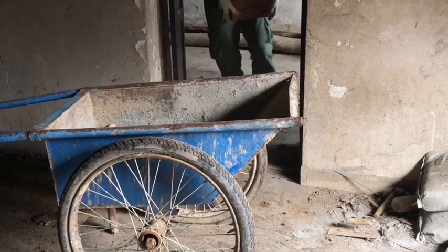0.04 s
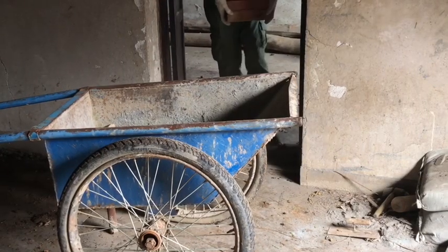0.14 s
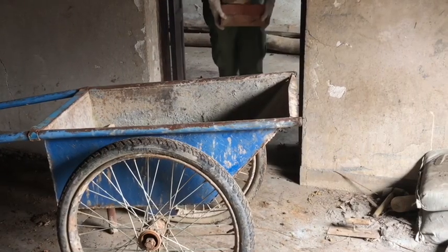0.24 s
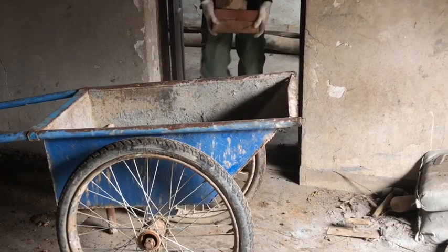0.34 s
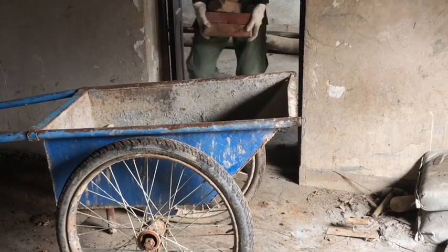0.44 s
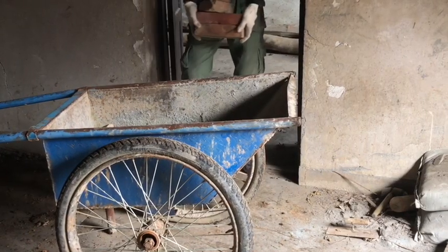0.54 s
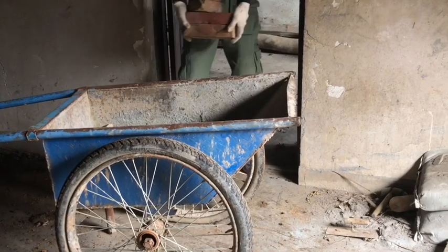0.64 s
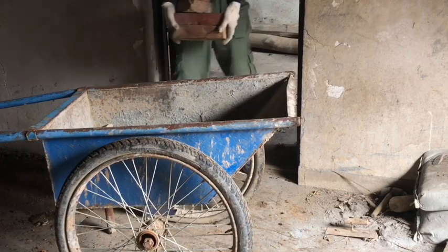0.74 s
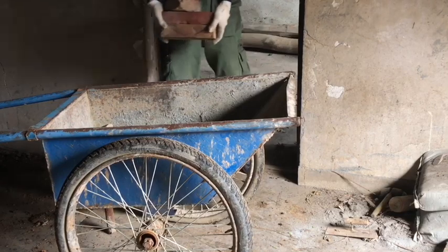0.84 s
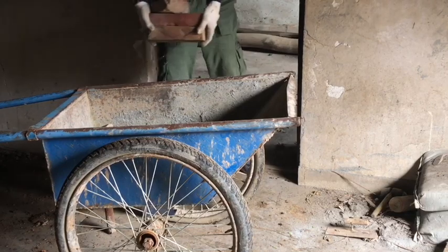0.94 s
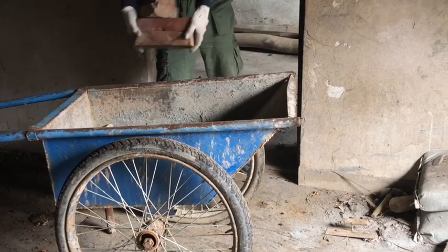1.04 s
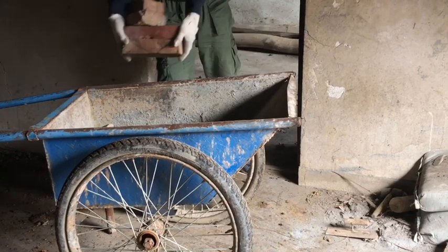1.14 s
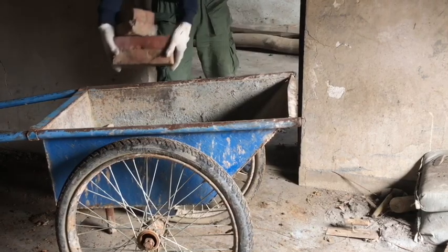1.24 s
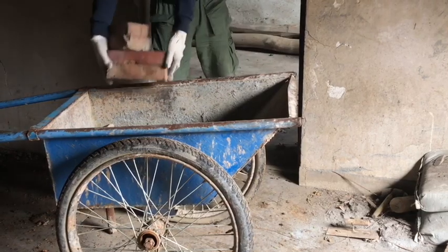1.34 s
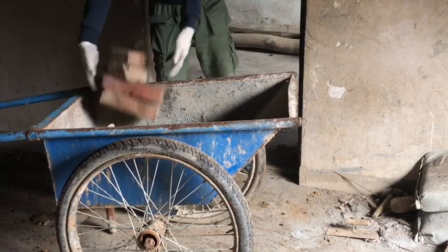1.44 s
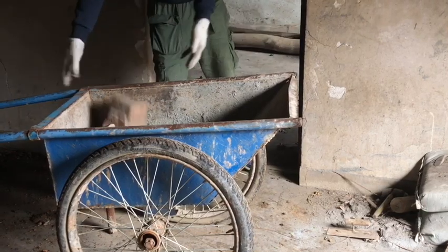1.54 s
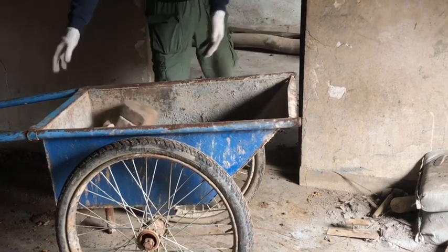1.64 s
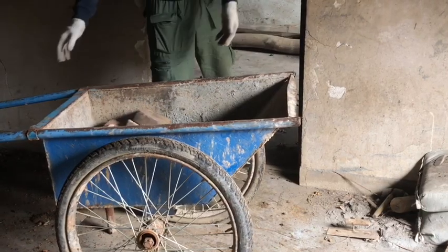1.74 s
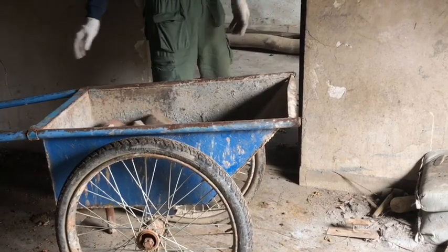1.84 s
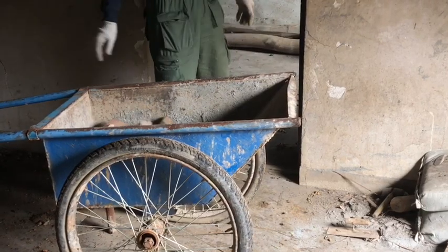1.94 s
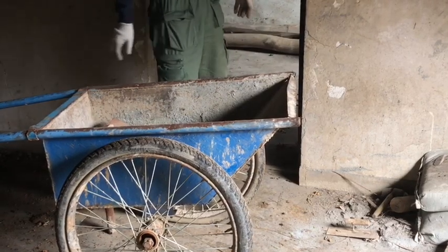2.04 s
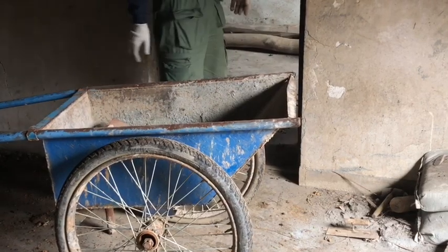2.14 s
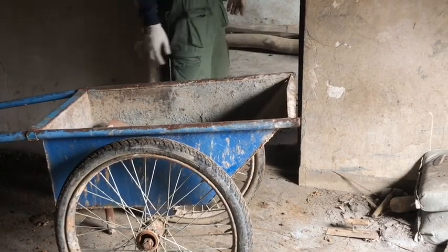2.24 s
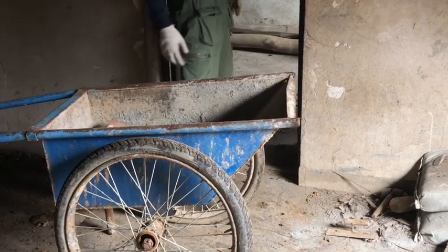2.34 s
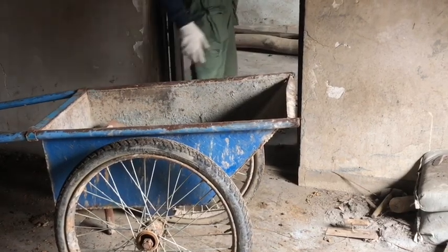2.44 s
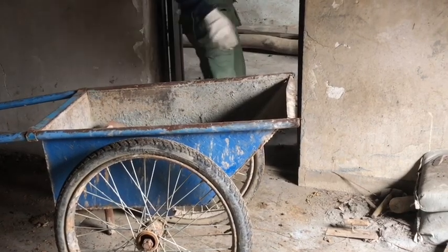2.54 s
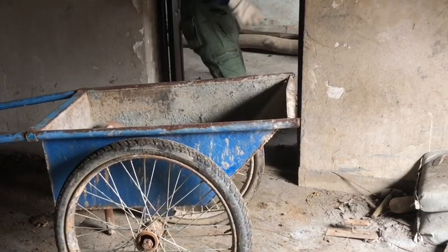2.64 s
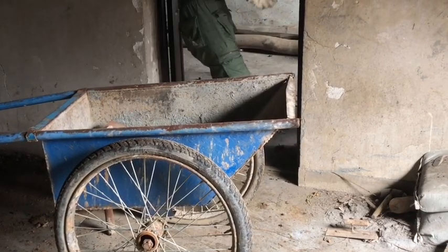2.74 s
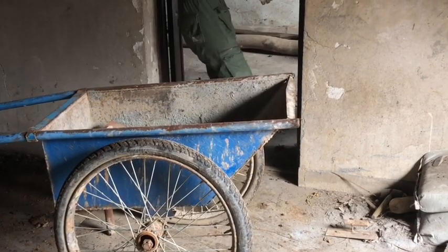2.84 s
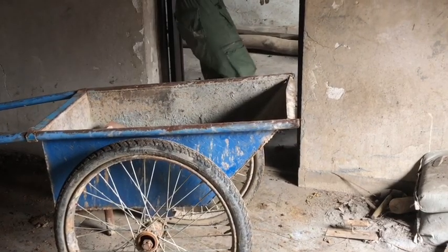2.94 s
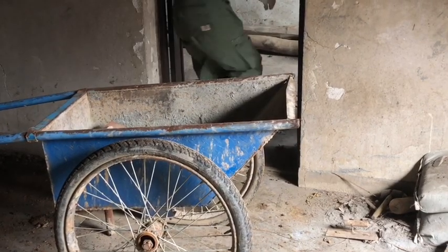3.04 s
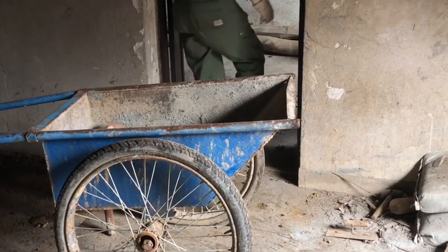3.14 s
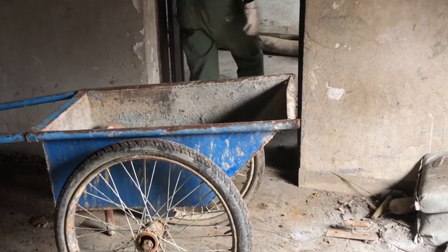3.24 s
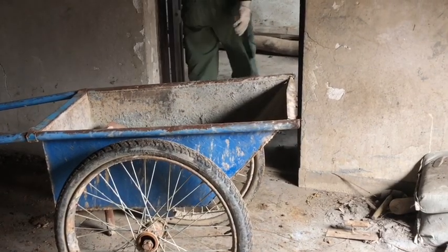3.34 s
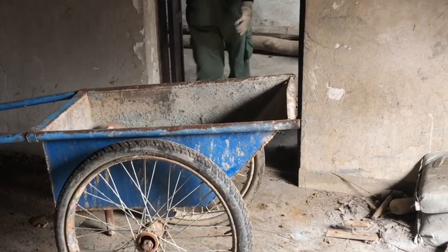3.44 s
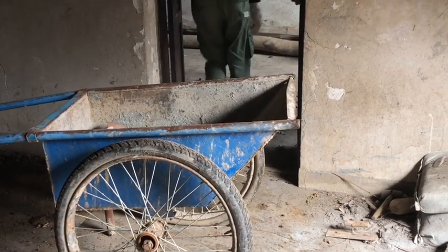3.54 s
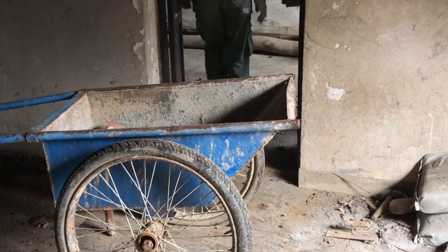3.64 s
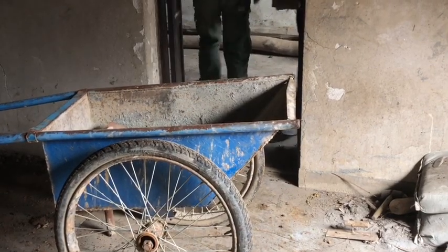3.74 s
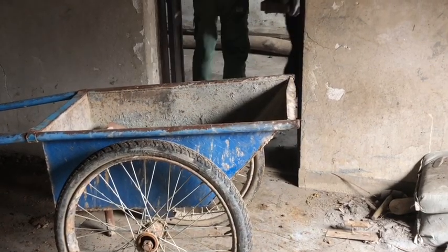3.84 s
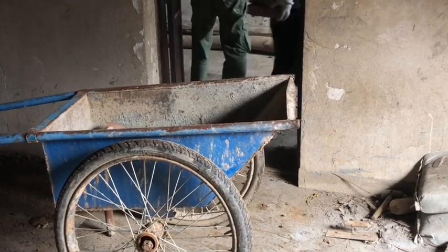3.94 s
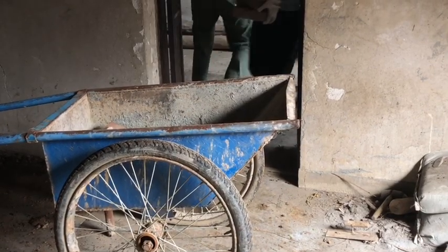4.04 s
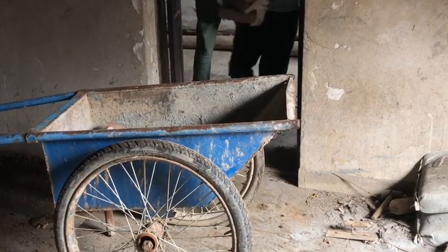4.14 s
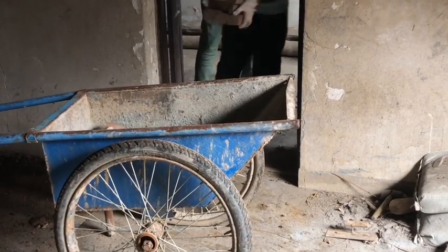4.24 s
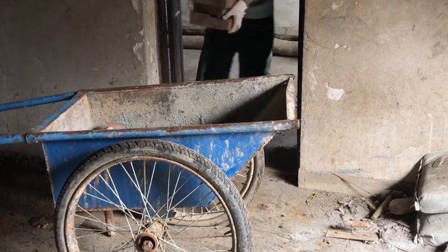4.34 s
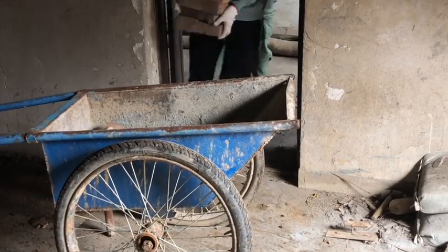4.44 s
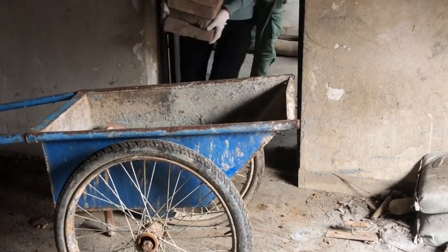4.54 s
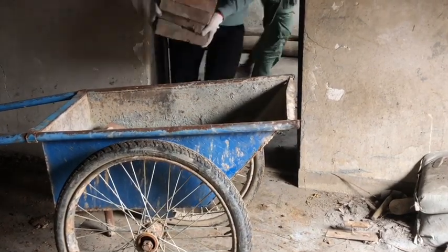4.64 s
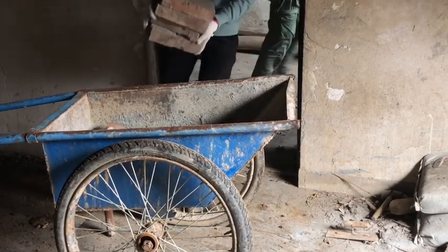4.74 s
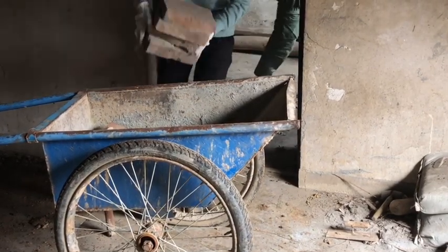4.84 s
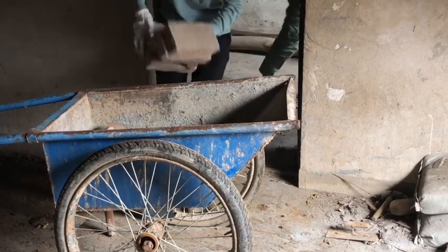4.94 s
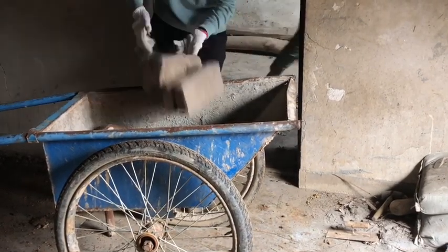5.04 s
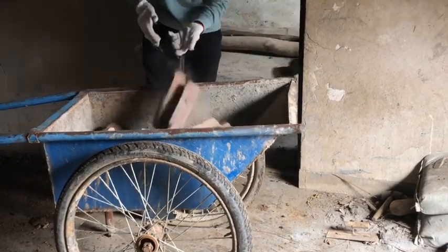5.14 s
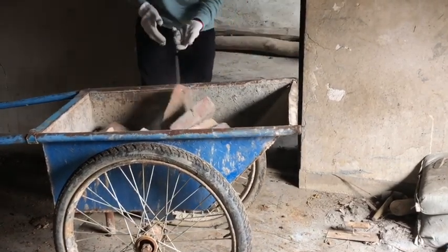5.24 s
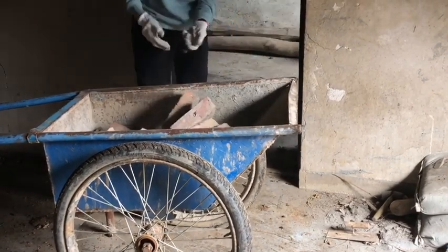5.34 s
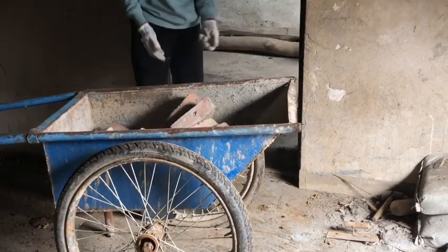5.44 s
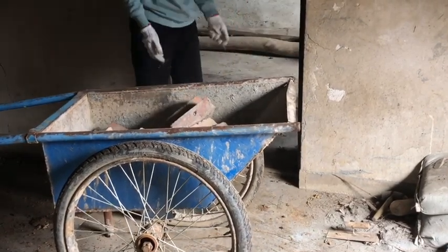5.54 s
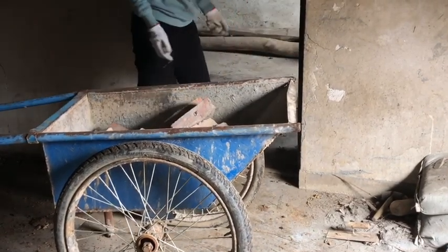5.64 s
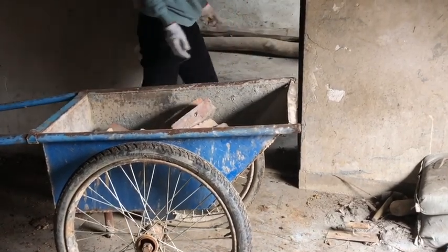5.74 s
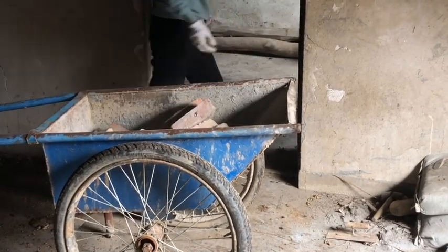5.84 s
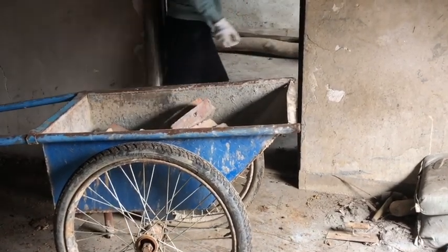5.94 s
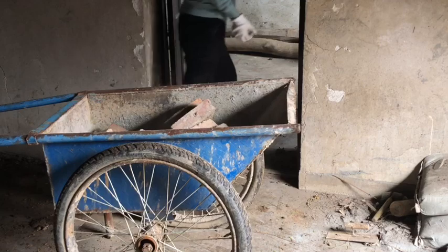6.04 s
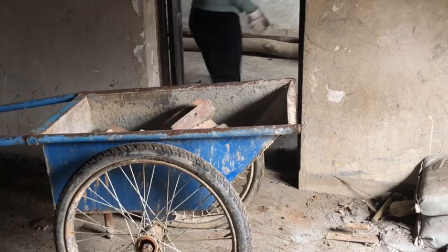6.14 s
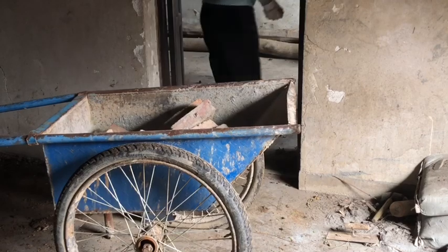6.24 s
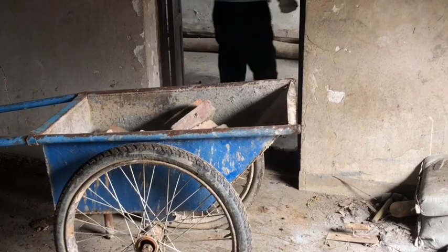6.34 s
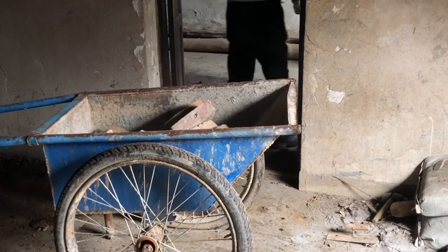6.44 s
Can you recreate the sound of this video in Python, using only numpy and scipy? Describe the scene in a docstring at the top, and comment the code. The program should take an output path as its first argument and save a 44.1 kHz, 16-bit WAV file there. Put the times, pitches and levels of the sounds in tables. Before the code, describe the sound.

A bare, hard-walled room with very faint low air noise, heard close to a steel hand cart, in mono. From 0 to 0.5 s boots tread on gritty concrete, the last step firmer, with a loose piece of metal ringing lightly around 0.4 s. At 1.5 s an armful of bricks slams into the cart: several blows within a tenth of a second, a deep hollow tray boom, dry clay clacks, grit and short sliding squeaks, flattened by limiting. Smaller settling knocks follow, clearest at 2.05 s, fading by 2.4 s. Then near quiet, with faint scuffs at 2.5 and 3.1 s, soft steps at 3.3, 3.7, 4.3 and 4.6 s and tiny crumb snaps. At 5.0 s the second load tumbles in, blows spread to 5.35 s with brighter grit and squeals, a last knock at 5.5 s, small settling ticks, then scuffs at 5.85 s and a faint step at 6.4 s.

```python
"""Two armfuls of old bricks are dropped into a steel hand cart in a bare, unfinished room.
Each brick excites a decaying floor note, damped modes of panels and clay, and a spray of grit; the pile settles.
Before, between and after the throws, shaped noise gives boots that tread and scuff on dusty concrete.
Crumbs snap, sliding bricks sing and loose metal clinks; walls add diffuse reflections and the air a faint noise.
The recorder's limiter holds the crashes down."""
import sys
import numpy as np
from scipy import signal
from scipy.fft import rfft, irfft
from scipy.io import wavfile
from scipy.ndimage import uniform_filter1d, minimum_filter1d

SR = 44100
rng = np.random.default_rng(int(sys.argv[2]) if len(sys.argv) > 2 else 0)


def persist_wave(psi):
    """Save psi, clipped to +-1, as 16-bit WAV."""
    counts = np.round(np.clip(psi, -1, 1) * 32767).astype(np.int16)
    wavfile.write(sys.argv[1], SR, np.atleast_2d(counts).T)


N = 285975
AGE = np.arange(2 ** 15) / SR  # time since the onset of one sound [s]


def from_db(db):
    """Level: converts decibels to an amplitude ratio."""
    return 10 ** (np.asarray(db) / 20)


def rms_one(x):
    """Normalization: scales a signal to unit root mean square."""
    return x / np.sqrt(np.mean(x ** 2) + 1e-20)


def at_hz(points, hz):
    """Logarithmic frequency scale: interpolates a table along it."""
    f, value = np.transpose(points)
    return np.interp(np.log(np.maximum(hz, 1)), np.log(f), value)


def noise(spectrum, uneven_db, size=len(AGE)):
    """Random-phase synthesis: noise of a given colour with chance peaks and dips, rms 1."""
    hz = np.fft.rfftfreq(size, 1 / SR)
    peaks_hz = np.geomspace(200, 16000, 70)
    chance_db = uneven_db * np.interp(hz, peaks_hz, rng.standard_normal(len(peaks_hz)))
    magnitude = from_db(at_hz(spectrum, hz) + chance_db) * (hz > 20)
    phase = np.exp(2j * np.pi * rng.random(len(hz)))
    return rms_one(irfft(magnitude * phase, size))


def fade(t60, rise):
    """Exponential damping: a linear rise, then a loss of 60 dB in every t60 seconds."""
    return np.minimum(AGE / rise, 1) * np.exp(-np.log(1000) * AGE / t60)


def grains(spread_db, per_s):
    """Granular fracture: a stepwise random gain for a surface that breaks grain by grain."""
    gains = from_db(spread_db * rng.standard_normal(len(AGE)))
    step = (AGE * per_s).astype(int) % len(AGE)
    return rms_one(gains[step])


def add(track, s, sound):
    """Superposition: sums a sound into a track at time s."""
    start = max(round(s * SR), 0)
    track[start:start + len(sound)] += sound[:N - start]


# Reverberation of the room: (frequency [Hz], decay time t60 [s])
ROOM_DECAY = [(70, 1.1), (150, 0.93), (400, 0.56), (1000, 0.4), (2500, 0.43), (6000, 0.18), (14000, 0.24)]


def room(x, gap, build, size=15):
    """Diffuse reverberation: dense reflections from bare walls, lows lasting longest, about as strong as x."""
    hz = np.fft.rfftfreq(len(AGE), 1 / SR)
    white = np.exp(2j * np.pi * rng.random(len(AGE) // 2 + 1))
    octave = np.round(np.log2(np.maximum(hz, 2 ** 6)))
    tail = 0
    for k in np.unique(octave):
        tail = tail + irfft(white * (octave == k)) * fade(at_hz(ROOM_DECAY, 2 ** k), build)
    # evens out the reverberation's spectrum, so that no chance peak colours the sound
    response = rfft(tail, 2 * len(AGE))
    local_power = uniform_filter1d(np.abs(response) ** 2, size)
    even = irfft(response / np.sqrt(local_power))[:len(AGE)]
    delayed = np.pad(even, (round(abs(gap) * SR), 0))
    return signal.fftconvolve(x, delayed)[:N]


# Spectrum of the still air: (frequency [Hz], relative density [dB])
AIR_SPECTRUM = [(15, -36.5), (25, -12), (48, -3), (141, 0), (309, -7.5), (1370, -11.5), (2610, -18),
                (3620, -18.5), (12500, -29), (14800, -30), (16000, -39.5)]


def still_air():
    """Stationary noise: the steady, faint background of the building."""
    return from_db(-63) * noise(AIR_SPECTRUM, uneven_db=1.0, size=N)


# Spectrum of crushed clay: (frequency [Hz], relative density [dB])
GRIT_SPECTRUM = [(500, -12.5), (2000, -3.5), (4000, 4.5), (6500, -1), (9500, 2.5), (13000, -4),
                 (16000, -12.5)]


def crunch(rise):
    """Brittle fracture: a corner of fired clay cracks sharply, then sheds a short spray of grit."""
    crack = fade(t60=0.028, rise=rise)
    spray = from_db(-7) * fade(t60=0.18, rise=0.006)
    return noise(GRIT_SPECTRUM, uneven_db=2) * grains(spread_db=1.0, per_s=790) * (crack + spray)


def squeal(hz, length, size=256):
    """Stick-slip friction: a sliding edge holds a wavering note, then rings off."""
    waver_share, ring_t60_s = 0.0074, 0.12
    waver = 1 + waver_share * rms_one(uniform_filter1d(rng.standard_normal(len(AGE)), size))
    after_slide = np.maximum(AGE - length, 0)
    envelope = np.minimum(AGE / 0.003, 1) * np.exp(-np.log(1000) * after_slide / ring_t60_s)
    catching = rms_one(uniform_filter1d(grains(spread_db=4.5, per_s=200), size=128))
    return np.sin(2 * np.pi * hz * np.cumsum(waver) / SR) * envelope * catching


def clink(hz, t60, rise):
    """Intermittent contact: a loose piece chatters on its support, so its ring is uneven."""
    chatter = rms_one(uniform_filter1d(grains(spread_db=3.0, per_s=180), size=128))
    return np.sin(2 * np.pi * hz * AGE) * fade(t60, rise) * chatter


# Crumbs of mortar snapping: (time [s], level [dB])
CRUMB_SNAPS = [(0.228, -67), (0.632, -51.5), (.816, -63), (2.298, -60.5), (4.174, -55), (4.524, -60.5),
               (5.718, -54)]
# Brick edges sliding on the steel: (time [s], pitch [Hz], level [dB], length [s])
EDGE_SQUEALS = [(1.517, 2412, -18, .09), (1.529, 2595, -23.5, 0.034), (1.82, 2955, -57.5, 0.22),
                (2.415, 2412, -58, 0.053), (5.088, 1975, -23, 0.083), (5.115, 2304, -25, 0.084),
                (5.162, 1590, -20, 0.031), (5.156, 2830, -22.5, 0.067)]
# A loose piece of metal jostled underfoot: (time [s], level [dB])
METAL_JOSTLES = [(0.304, -42.5), (.42, -34), (0.473, -28.5)]
# Modes of the loose metal: (frequency [Hz], relative level [dB], decay time t60 [s])
METAL_MODES = [(1505.3, -3, 0.49), (1863, -17, 0.41), (2158, -17, .45), (2465, -16.5, 0.37)]


def debris():
    """Fracture, friction and modal ringing: crumbs snap, sliding bricks sing, loose metal clinks."""
    near, far = np.zeros(N), np.zeros(N)  # near the cart; by the doorway
    for s, db in CRUMB_SNAPS:
        add(near, s, from_db(db) * crunch(rise=0.00022))
    for s, hz, db, length in EDGE_SQUEALS:
        add(near, s, from_db(db) * squeal(hz, length))
    for s, db in METAL_JOSTLES:
        for hz, mode_db, t60 in METAL_MODES:
            # the loose metal swells into its ring
            add(far, s, from_db(db + mode_db) * clink(hz, t60, rise=0.021))
    # the room answers the distant metal more strongly
    return near + far + room(from_db(-13) * near + from_db(-5) * far, gap=0.014, build=0.0036)


# Spectrum of a weight taken up, by a floor or by the cart's frame: (frequency [Hz], relative density [dB])
THUMP_SPECTRUM = [(25, -26.5), (65, -5), (140, 2), (220, -12), (400, -15), (1500, -52)]
# Spectrum of a sole on grit, at pitch ratio 1: (frequency [Hz], relative density [dB])
SLAP_SPECTRUM = [(70, -17), (200, -1), (330, 1.5), (800, -4), (1300, -10.5), (2500, -29), (6000, -30.5),
                 (15000, -51.5)]


def tread(thump_db, slap_db, pitch, rise):
    """Impact excitation: the weight thumps, the sole slaps on grit with its spectrum scaled in pitch."""
    weight = noise(THUMP_SPECTRUM, uneven_db=2.0) * fade(t60=0.49, rise=rise)
    scaled_spectrum = [(hz * pitch, db) for hz, db in SLAP_SPECTRUM]
    slap = noise(scaled_spectrum, uneven_db=3.0) * grains(spread_db=4.0, per_s=500) * fade(t60=0.23, rise=rise)
    return from_db(thump_db) * weight + from_db(slap_db) * slap


# Spectra of rubbing on dust, low and high: (frequency [Hz], relative density [dB])
RASP_SPECTRUM = [(100, -11.5), (300, -4.5), (700, 1.5), (1700, -1), (3000, -3), (6000, -13), (15000, -35)]
HISS_SPECTRUM = [(800, -12), (2500, -6.5), (4500, 2), (7000, -1.5), (11000, -6), (16000, -15.5)]


def scuff(length, rasp_db, hiss_db):
    """Sliding friction: a stroke catches and slips, and crushes sand as it goes."""
    stroke = np.sqrt(np.abs(np.sin(np.pi * np.minimum(AGE / length, 1))))
    catching = grains(spread_db=1.0, per_s=110)
    rasp = from_db(rasp_db) * noise(RASP_SPECTRUM, uneven_db=2.0)
    hiss = from_db(hiss_db) * noise(HISS_SPECTRUM, uneven_db=3.0)
    return stroke * catching * (rasp + hiss) * grains(spread_db=2.5, per_s=1400)


# Footfalls: (time [s], heel thump level [dB], heel slap level [dB], slap pitch ratio [1], rise [s])
FOOTFALLS = [(0.0, -47.5, -59.5, 1, 0.0028), (.229, -42.5, -40.5, 1.16, 0.0098),
             (.408, -36.5, -22, 1.05, 0.023), (3.321, -50.5, -48.5, 1.74, 0.0062),
             (3.664, -50.5, -38.5, 0.59, 0.017), (4.292, -54.5, -39.5, 1.09, .0015),
             (4.565, -45.5, -41.5, 1.1, 0.016), (6.41, -50.5, -55, 1.1, 0.023)]
# Soles and gloves rubbing on dust: (time [s], length [s], rasp level [dB], hiss level [dB])
DUST_SCUFFS = [(0.384, 0.076, -68, -51), (0.977, 0.16, -64, -74.5), (1.251, 0.14, -62.5, -64),
               (2.517, 0.098, -52.5, -55), (3.083, 0.065, -52, -66), (3.698, 0.27, -59.5, -65.5),
               (4.248, 0.062, -55, -61.5), (4.552, 0.15, -52.5, -70), (4.791, 0.23, -54.5, -60),
               (5.831, 0.079, -47.5, -59.5), (5.907, 0.098, -47.5, -61), (6.365, 0.13, -55, -58.5)]


def boots():
    """Impact and friction: footfalls roll from heel to flat sole, scuffs rub, walls reflect both."""
    roll_s, flat_thump_db, flat_slap_db = 0.05, -1, -3.5  # heel to flat sole; flat sole against heel
    out = np.zeros(N)
    for s, thump_db, slap_db, pitch, rise in FOOTFALLS:
        add(out, s, tread(thump_db, slap_db, pitch, rise))
        add(out, s + roll_s, tread(thump_db + flat_thump_db, slap_db + flat_slap_db, pitch, rise))
    for s, length, rasp_db, hiss_db in DUST_SCUFFS:
        add(out, s, scuff(length, rasp_db, hiss_db))
    return out + from_db(-1.5) * room(out, gap=0.005, build=0.03)


def rings(modes, spread_db, size):
    """Modal superposition: the point of contact gives each mode its own strength and sign."""
    waves = np.array([from_db(db) * np.sin(2 * np.pi * hz * AGE) * fade(t60, rise=0.0016)
                      for hz, db, t60 in modes])
    shape = size, len(modes)
    strengths = from_db(spread_db * rng.standard_normal(shape)) * rng.choice([-1, 1], shape)
    return strengths @ waves


def detuned(sound, share):
    """Time scaling: the same ringing a little higher and shorter, or lower and longer."""
    return np.interp(AGE * np.exp(share * rng.standard_normal()), AGE, sound, right=0)


FLOP_S = 0.03  # typical time for a brick to fall flat after its corner strikes


def floor_boom(hz):
    """Membrane-like drumming: the tray floor sounds its note while frame and wheels take the weight."""
    envelope = fade(t60=0.24, rise=0.01)
    drum = np.sin(2 * np.pi * hz * AGE) * envelope
    thud = from_db(-18) * noise(THUMP_SPECTRUM, uneven_db=0.0) * fade(t60=0.22, rise=0.01)
    return drum + thud


# Spectrum of the dense panel modes: (frequency [Hz], relative density [dB])
KNOCK_SPECTRUM = [(30, -27), (70, -22), (130, -5.5), (300, 5), (700, -6.5), (1100, -11), (1700, -22.5),
                  (3000, -27.5), (8000, -46)]


def panel_knock(ring):
    """Plate vibration: under the clear modes lie many more, damped quickly by the load."""
    dense = noise(KNOCK_SPECTRUM, uneven_db=2.3) * fade(t60=0.22, rise=0.0025)
    # the shifting load detunes the tray from contact to contact
    return dense + from_db(-8.5) * detuned(ring, share=0.008)


# Spectrum of brick on brick: (frequency [Hz], relative density [dB])
CLACK_SPECTRUM = [(300, -18), (750, 4.5), (1200, 2.5), (2000, -4.5), (2700, -10.5), (3400, -14),
                  (6000, -23.5), (15000, -48.5)]


def brick_clack(ring):
    """Solid-body impact: a short burst of noise with the brick's own modes beneath it."""
    burst = noise(CLACK_SPECTRUM, uneven_db=2.0) * fade(t60=0.15, rise=0.00091)
    return burst + from_db(-20) * ring


# Bricks striking the cart or the pile, corner first: (time [s], floor boom level [dB], boom pitch [Hz],
# panel knock, brick clack and grit at first contact [dB, each relative within its own layer])
BRICK_BLOWS = [ (1.503, -8, 151.4, -6, -1, -21), (1.532, -3.5, 164.4, -10.5, -5, -23.5),
               (1.563, -10, 163, -11.5, -12, -47), (1.594, -5, 160.2, -14, -9.5, -44.5),
               (1.764, -31.5, 146, -54, -31.5, -40.5), (1.854, -30, 101, -35, -34, -41.5),
               (1.891, -38, 173, -27, -45, -44), (2.028, -17, 186.6, -25.5, -25.5, -34.5),
               (2.046, -16, 185.5, -17, -25.5, -39), (2.198, -27.5, 128, -47, -46, -48.5),
               (2.416, -38.5, 146, -53, -55, -57.5), (5.002, -13.5, 170, -2, -25, -17.5),
               (5.086, -11, 136, -9.5, -3, -16.5), (5.112, -7.5, 206, -6.5, -10, -44),
               (5.163, -5.5, 157, -17, -8.5, -29), (5.189, -14.5, 190.6, -17, -21.5, -22),
               (5.231, -8.5, 170.6, -20, -13.5, -26.5), (5.328, -15, 177.4, -24.5, -24.5, -33.5),
               (5.510, -20.5, 156.4, -34.5, -32, -39), (5.590, -31, 165.2, -40.5, -36.5, -56),
               (5.682, -41, 134.4, -54, -45, -56)]


def contacts(count=3):
    """Inelastic rebound: a brick rocks to rest in rows of (s, knock dB, clack dB, grit dB)."""
    shrink, scatter = 0.85, 0.11  # typical ratio of one gap to the last; its logarithmic scatter
    knock_loss, clack_loss, grit_loss = 4.5, 7.5, 16.5  # dB lost from one contact to the next
    rows = []
    for s, _, _, knock_db, clack_db, grit_db in BRICK_BLOWS:
        for k in range(count):
            rows.append((s, knock_db - k * knock_loss, clack_db - k * clack_loss, grit_db - k * grit_loss))
            s = s + FLOP_S * shrink ** k * np.exp(scatter * rng.standard_normal())
    return rows


# Modes of the steel tray, before detuning: (frequency [Hz], relative level [dB], decay time t60 [s])
TRAY_MODES = [(132.3, -14, 1), (171, -19, 0.59), (218.3, -13, 1), (276.5, -10, 0.56), (304.8, 5.5, 0.12),
              (331, -3, 0.18), (370.6, -5, 0.79), (419.8, -11, 0.52), (475.8, -4, 0.24), (565, -19.5, 1),
              (645, -12.5, 0.25), (666.6, -7.5, 0.3), (730, -13.5, .4), (800, -16.5, .35),
              (882, -9.5, 0.47), (930, -19.5, 0.45), (966, -15, .4), (1044, -15.5, 0.71)]
# Modes of the bricks: (frequency [Hz], relative level [dB], decay time t60 [s])
BRICK_MODES = [(1580, -8.5, 0.12), (1590, -5.5, .15), (1975, -8.5, .22), (2080, -14, .2),
               (2304, -7.5, 0.19), (2412, -7, .18), (2460, -9.5, .12), (2520, -8, 0.083)]


def bricks():
    """Coupled impact: every contact excites panels and clay; falling flat drums the tray floor."""
    panel_lag_s = 0.003  # the panels answer just after the corner crushes
    booms, clatter, hits = np.zeros(N), np.zeros(N), contacts()
    for s, boom_db, hz, *_ in BRICK_BLOWS:
        add(booms, s + FLOP_S, from_db(boom_db) * floor_boom(hz))
    tray_rings = rings(TRAY_MODES, spread_db=6.0, size=len(hits))
    brick_rings = rings(BRICK_MODES, spread_db=0.3, size=len(hits))
    for (s, knock_db, clack_db, grit_db), tray, brick in zip(hits, tray_rings, brick_rings):
        add(clatter, s + panel_lag_s, from_db(knock_db - 2.0) * panel_knock(tray))
        add(clatter, s, from_db(clack_db - 5.0) * brick_clack(brick))
        add(clatter, s, from_db(grit_db) * crunch(rise=0.001))
    sent_to_room = from_db(-8) * booms + from_db(-9.0) * clatter
    return booms + clatter + room(sent_to_room, gap=0.007, build=0.0081)


def scene():
    """Superposition: still air, debris, boots and bricks sum to one channel."""
    return (still_air() + debris() + boots() + bricks())[None]


def limiter(x, ceiling_db, release_db_per_s, size=64):
    """Peak limiting: looks just ahead, ducks quickly for a peak and recovers steadily in decibels."""
    over = np.maximum(20 * np.log10(np.abs(x) + 1e-9) - ceiling_db, 0)
    recovery = release_db_per_s * np.arange(N) / SR
    duck = np.maximum.accumulate(over + recovery, axis=-1) - recovery
    ahead = minimum_filter1d(-duck, size)
    return x * from_db(uniform_filter1d(ahead, size))


def record(dry):
    """Band limiting and compression: deepest bass is shed, crashes are flattened, the top is cut."""
    lean = signal.sosfilt(signal.butter(2, 44, "high", fs=SR, output="sos"), dry)
    held = limiter(lean, ceiling_db=-1.3, release_db_per_s=174.5)
    # passband edge 15900 Hz, ripple 0.1 dB, stopband 80 dB down
    return signal.sosfilt(signal.ellip(10, 0.1, 80, 15900, fs=SR, output="sos"), held)


dry = scene()
out = record(dry)
persist_wave(out)
```